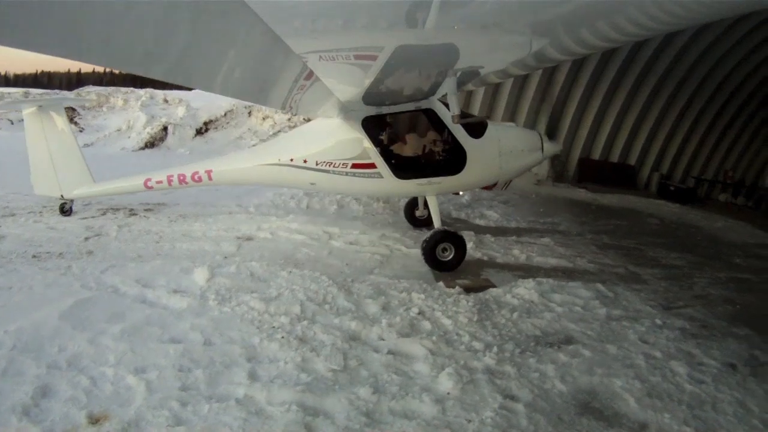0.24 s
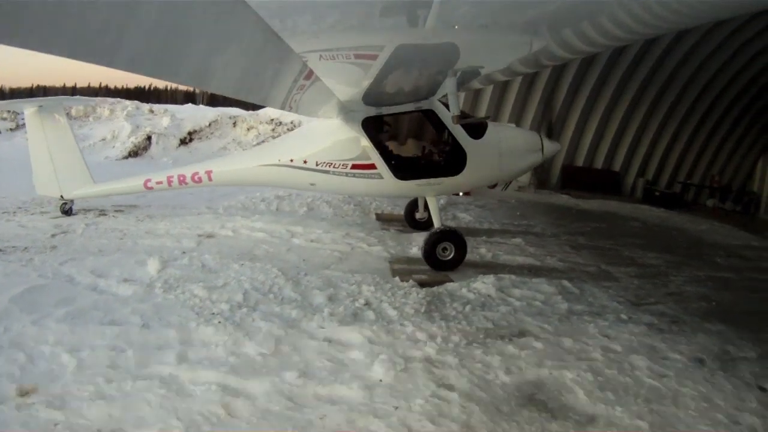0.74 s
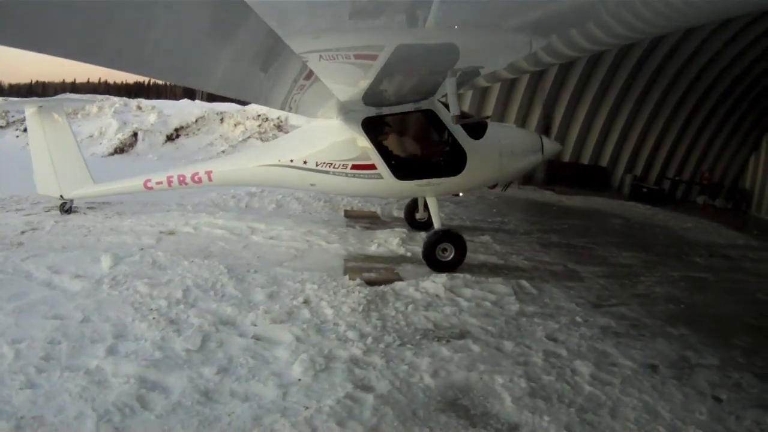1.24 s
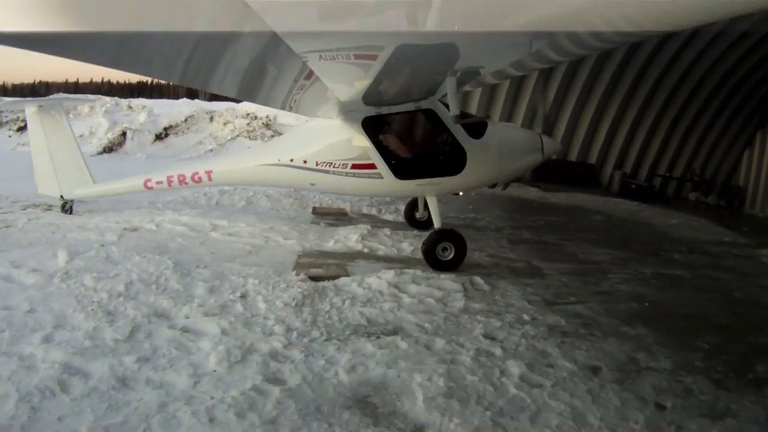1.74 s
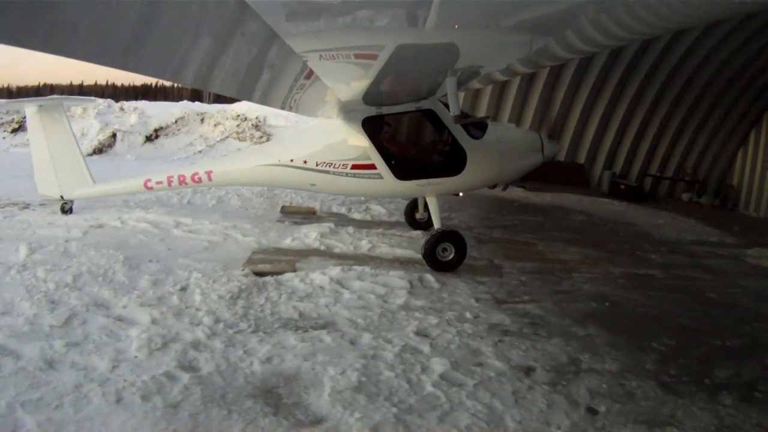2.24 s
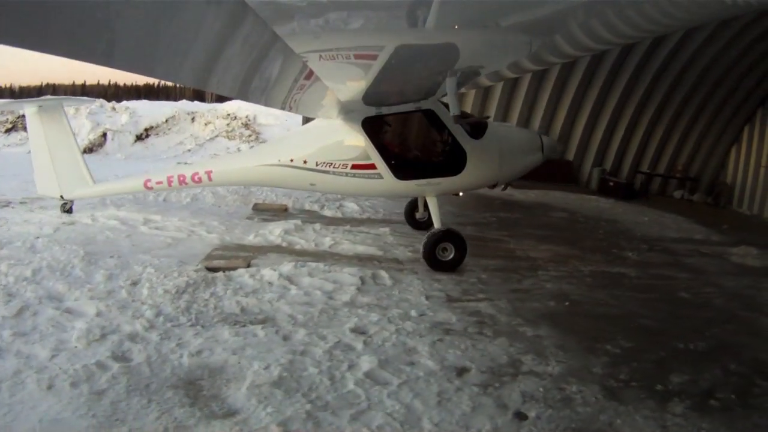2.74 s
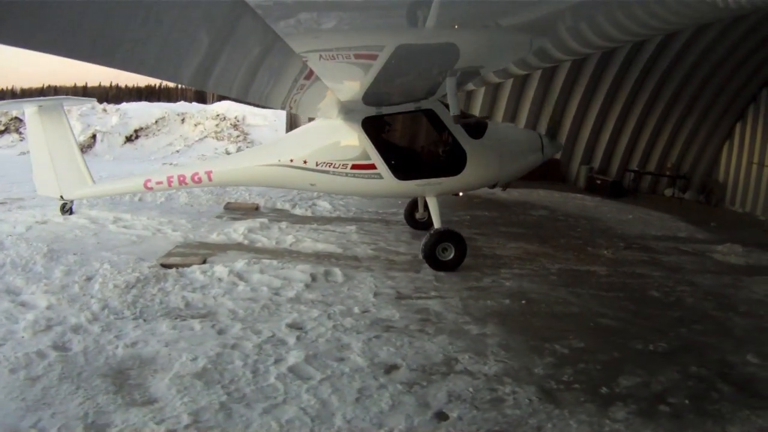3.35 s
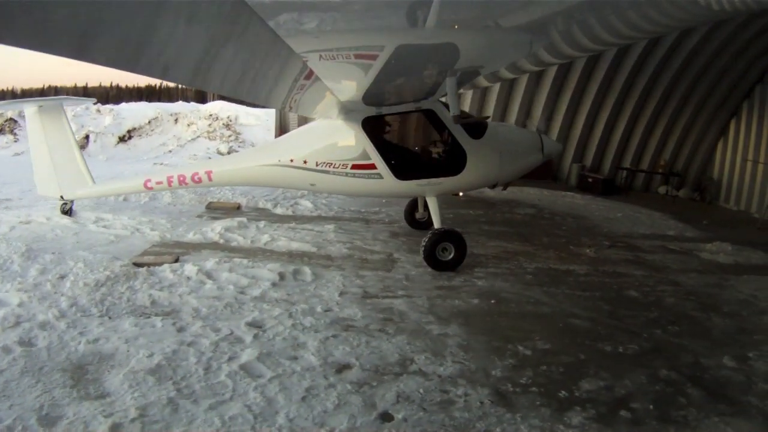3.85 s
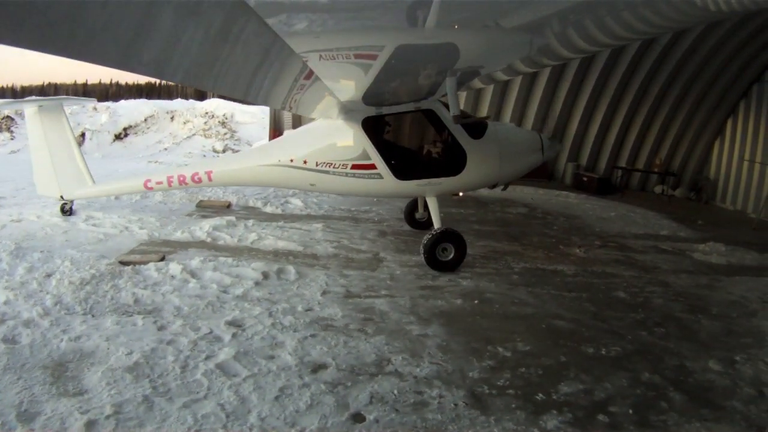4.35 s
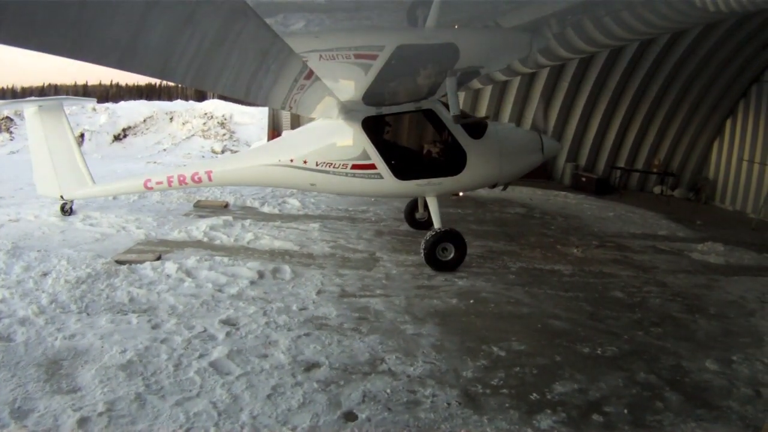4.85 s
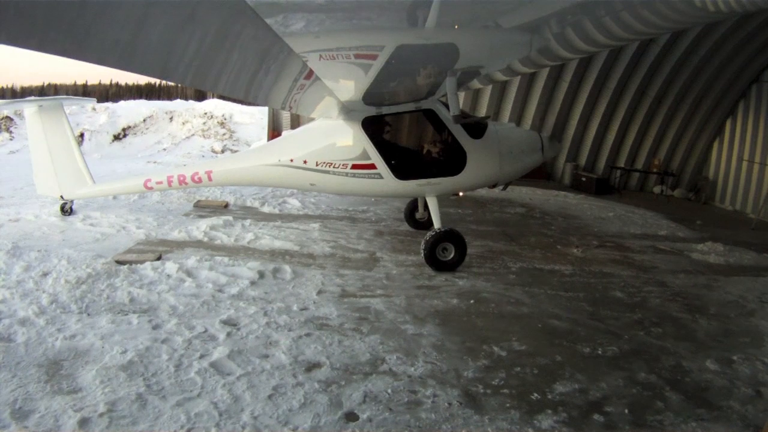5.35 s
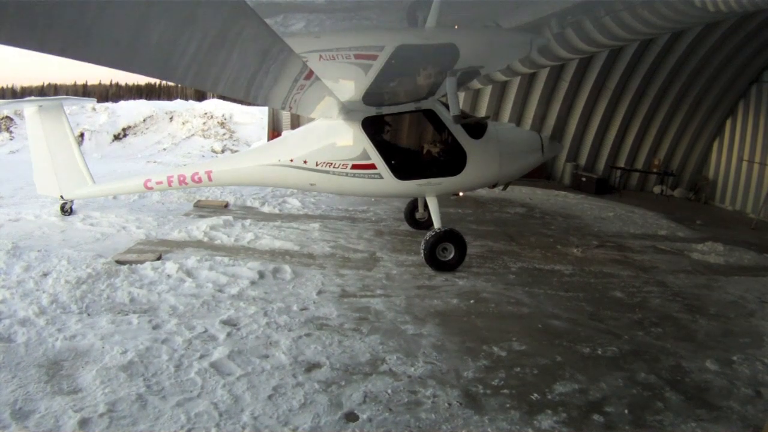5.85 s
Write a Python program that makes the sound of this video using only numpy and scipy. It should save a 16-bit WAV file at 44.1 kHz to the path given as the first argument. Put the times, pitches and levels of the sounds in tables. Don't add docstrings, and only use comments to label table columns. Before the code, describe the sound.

A small propeller plane taxies across snow toward a hangar: steady low engine throb, muffled roar, airy propeller hiss and irregular clicks from breaking crust. Just after two seconds the revs fall rapidly and settle into a slower, softer, clattery idle with few ticks. Close wing-mounted camera sound, vibrating, boxy and gritty, with a brittle digital edge on top.

```python
import sys
import numpy as np
from scipy import signal
from scipy.fft import rfft, irfft
from scipy.io import wavfile
from scipy.ndimage import uniform_filter1d

SR = 44100
rng = np.random.default_rng(int(sys.argv[2]) if len(sys.argv) > 2 else 0)


def wav_record(signal):
    frames = np.transpose(np.atleast_2d(signal))
    bounded = np.clip(frames, -1, 1)
    quanta = np.round(bounded * 32767).astype(np.int16)
    wavfile.write(sys.argv[1], SR, quanta)


def invert_db(x):
    u = np.asarray(x, float) / 20
    return 10 ** u


N = 269451


def rms_one(x):
    return x / np.sqrt(np.mean(x ** 2) + 1e-20)


def in_time(rows):
    s, *columns = np.transpose(rows)
    return [np.interp(np.arange(N) / SR, s, c) for c in columns]


def drift(rate):
    r = np.exp(-80 * np.pi * rate / SR)
    white = rng.standard_normal(N // 40 + 2002)
    slow = signal.lfilter([1], [1, -2 * r, r * r], white)[2000:]
    return np.interp(np.arange(N) / 40, np.arange(len(slow)), rms_one(slow))


def resonate(x, hz, width):
    r = np.exp(-np.pi * width / SR)
    zeros = [(1 - r * r) / 2, 0, (r * r - 1) / 2]
    poles = [1, -2 * r * np.cos(2 * np.pi * hz / SR), r * r]
    return signal.lfilter(zeros, poles, signal.lfilter(zeros, poles, x))


def coloured(points):
    hz, level_db = np.transpose(points)
    grid_hz = np.arange(1, N // 2 + 2) * SR / N
    shape = invert_db(np.interp(np.log(grid_hz), np.log(hz), level_db, left=-60))
    return rms_one(irfft(rfft(rng.standard_normal(N)) * shape, N))


def beat(turns, sharp):
    return np.exp(sharp * (np.cos(2 * np.pi * turns) - 1))


def by_throttle(row, throttle, firing_db):
    power_db, idle_db, share = row
    return throttle * power_db + (1 - throttle) * idle_db + share * firing_db


def ground_rumble():
    # f/Hz, level per Hz/dB
    rumble_spectrum = [(12, -9), (30, 24.5), (60, 2), (95, 6.5), (145, -2), (250, -5), (450, 2.5),
                       (650, -7), (1000, -6.5), (1500, -11), (3000, -25), (4500, -36)]
    return invert_db(1.36 * drift(14)) * coloured(rumble_spectrum)


def slipstream():
    # f/Hz, level per Hz/dB
    hiss_spectrum = [(2200, -8), (2900, 12), (3900, 14), (4450, 4.5), (5000, 7.5), (5550, 8), (6000, 0.5),
                     (7000, -20)]
    gusts_db = 1.2 * drift(40) + .9 * drift(16)
    return invert_db(gusts_db) * coloured(hiss_spectrum)


def wing():
    # t/s, level/dB
    swings = [(-0.048, -17.0), (0.284, -16.0), (0.46, -23.0), (0.724, -26.0), (1.044, -21.0), (1.318, -19.0),
              (1.474, -22.0), (1.724, -26.0), (1.972, -17.0), (2.118, -15.0), (2.386, -20.0), (2.544, -28.0),
              (2.658, -19.0), (2.808, -20.0), (3.068, -25.0), (3.606, -24.0), (4.07, -22.0), (4.52, -24.0),
              (5.586, -27.0), (5.852, -24.0)]
    bending_hz, rise_s, fade_s = 33, .07, .2
    out = np.zeros(N)
    for s, db in swings:
        since = np.maximum(np.arange(N) / SR - s, 0)
        envelope = (1 - np.exp(-since / rise_s)) * np.exp(-since / fade_s)
        out += invert_db(db + 0.8) * envelope * np.sin(2 * np.pi * bending_hz * since)
    return out


def panels(throttle, falling):
    # f/Hz, width/Hz, level/dB, rise under power/dB, rise per turn/s lost each second/dB
    panel_modes = [(19.2, 2.3, -54, 1, 0), (47.15, 4.5, -44.5, 6, 0), (109.8, 11, -54.5, 5, 0.1824),
                   (203.6, 18.5, -62, 4.5, 0.5056), (406.2, 35, -63.5, 9.5, 0)]
    out = np.zeros(N)
    for hz, width, db, power_db, shudder_db in panel_modes:
        ring = rms_one(resonate(rng.standard_normal(N), hz, width))
        out += invert_db(db) * ring * invert_db(power_db * throttle - shudder_db * falling)
    return out


def ticks(throttle):
    # t/s, peak level/dB
    crust_breaks = [(0.2593, -38), (0.3344, -38), (0.3431, -22), (0.3634, -35), (0.38, -34), (0.3954, -34),
                    (0.4125, -30), (0.4244, -35), (0.4334, -35), (0.4464, -34), (0.5357, -36),
                    (0.5487, -27), (0.5654, -36), (0.5891, -35), (0.7517, -36), (0.9714, -38),
                    (1.1727, -38), (1.1907, -35), (1.3733, -31), (1.4197, -36), (1.5189, -32),
                    (1.5324, -22), (1.5514, -36), (1.5723, -36), (2.2144, -41), (2.3585, -36),
                    (2.3674, -35), (2.5112, -41), (2.7596, -41), (2.8774, -35)]
    s, peak_db = np.transpose(crust_breaks)
    at = np.round((s + .0009) * SR).astype(int)
    jolts = np.full(N, 1e-18)
    jolts[at] = np.sqrt(np.maximum(invert_db(2 * peak_db) - invert_db(-87), 1e-6))
    crackle = rng.random(N) < 4 * throttle / SR
    jolts += crackle * invert_db(-43 + 2.5 * rng.standard_normal(N))
    grit_fade = invert_db(-60 / (.03 * SR))
    grit = signal.lfilter([1], [1, -grit_fade], np.sqrt(.04 * jolts)) * rng.standard_normal(N)
    jolts[at + round(.0007 * SR)] = -.6 * jolts[at]
    ring_hz, ring_db, ring_t60_s = 2250, -27.5, .005
    r, w = invert_db(-60 / (ring_t60_s * SR)), 2 * np.pi * ring_hz / SR
    ring = signal.lfilter([0, invert_db(ring_db)], [1, -2 * r * np.cos(w), r * r], jolts)
    crack_band = signal.butter(2, (1950, 5400), "band", fs=SR, output="sos")
    return invert_db(22.5) * signal.sosfilt(crack_band, jolts + ring + .05 * grit)


def clatter(turns, throttle):
    # f/Hz, width/Hz, level/dB
    valve_modes = [(3618, 225, 12), (3850, 1800, -14)]
    uneven = invert_db(3 * drift(35))
    seatings = beat(turns, 8) + .6 * beat(turns + .5, 8)
    white = (.6 + .8 * throttle + uneven * seatings) * rng.standard_normal(N)
    return rms_one(sum(invert_db(db) * resonate(white, hz, 0.81 * width) for hz, width, db in valve_modes))


def roar(turns, throttle):
    # f/Hz, width/Hz, level/dB
    housing_modes = [(778, 76, -10.5), (870.8, 36.5, -2), (1220, 174, -6.5), (1396, 90, -10),
                     (1715, 92, -7), (1853, 205, 0.5), (2236, 193, -7), (2514, 218, -9.5), (3065, 47, -10)]
    power_tilt = [-2, -0.8, -5.5, -0.8, 3, -0.8, -1.5, -0.5, -35]
    puffs = 1 + 0.42 * beat(2 * turns, 2.1) * invert_db(2.1 * drift(7.7))
    white = rng.standard_normal((2, N)) * puffs * invert_db(0.42 * drift(17.5))
    out = np.zeros(N)
    for k, (hz, width, db) in enumerate(housing_modes):
        ring = resonate(white[k % 2], hz, 1.52 * width)
        out += invert_db(db) * ring * invert_db(power_tilt[k] * throttle + 1.1 * drift(32))
    return rms_one(out)


def spar(hz):
    # f/Hz, width/Hz, lift/dB
    spar_modes = [(55, 1.7, 13), (112.5, 9, 11.5), (161, 5, 15)]
    lifts = (invert_db(2 * db) / (1 + (2 * (hz - top_hz) / width) ** 2) for top_hz, width, db in spar_modes)
    return np.sqrt(1 + sum(lifts))


def crank(speed, turns, falling, throttle, unbalance_db, firing_db):
    strong_orders = {2: (-47, -53, .1), 3: (-63, -60, 0), 4: (-60, -48, .7), 6: (-42.5, -68, 1)}
    # multiple of crank speed, level/dB
    taxi_orders = [(0.5, -21), (1, 0), (1.5, -24), (2, -18), (2.5, -28), (3, -23), (3.5, -34), (4, -23),
                   (4.5, -36), (5, -24), (5.5, -32), (6, -14), (6.5, -38), (7, -35), (7.5, -39), (8, -28),
                   (8.5, -40), (9, -31), (9.5, -30), (10, -33), (10.5, -26), (11, -26), (11.5, -39),
                   (12, -33)]
    # multiple of crank speed, level/dB
    idle_orders = [(0.5, -25), (1, 0), (1.5, -13), (2, -8), (2.5, -30), (3, -22), (3.5, -31), (4, 0),
                   (4.5, -29), (5, -33), (5.5, -36), (6, -31), (6.5, -34), (7, -21), (7.5, -23), (8, -24),
                   (8.5, -28), (9, -22), (9.5, -35), (10, -33), (10.5, -38), (11, -35), (11.5, -39),
                   (12, -29)]
    out = invert_db(unbalance_db) * np.cos(2 * np.pi * turns)
    lull_db = -14 * 4 * throttle * (1 - throttle)
    for k, row in strong_orders.items():
        level_db = by_throttle(row, throttle, firing_db) + lull_db * (k in (3, 4)) + .9 * drift(5.0)
        out += invert_db(level_db) * spar(k * speed) * np.cos(2 * np.pi * k * turns)
    slowing_db = .5 * falling
    for (k, taxi_db), (_, idle_db) in zip(taxi_orders, idle_orders):
        if k <= 4 or k == 6:
            continue
        waver_db, start = 3.5 * drift(2.85), rng.random()
        level_db = throttle * (taxi_db - 30.5) + (1 - throttle) * (idle_db - 34.2)
        out += invert_db(level_db + slowing_db + waver_db - 1.5) * np.cos(2 * np.pi * (k * turns + start))
    return np.sqrt(2) * out


def scene():
    # t/s, crank speed/turns per s, unbalance level/dB
    engine_curve = [(0, 38.92, -36), (.3, 38.66, -30), (.75, 38.71, -32), (1.1, 38.77, -33),
                    (1.4, 38.33, -32), (1.6, 38.94, -31), (1.88, 38.46, -35), (2, 35.98, -46),
                    (2.2, 29.7, -33), (2.4, 27.07, -34), (2.7, 27.4, -39), (3, 27.93, -35),
                    (3.75, 27.61, -37), (4.05, 28.17, -36), (4.6, 27.97, -36), (5.3, 28.23, -37),
                    (5.6, 26.97, -39), (6.11, 26.71, -47)]
    # t/s, opening/0-1
    throttle_curve = [
        (0, 1),
        (1.96, 1),
        (2.17, 0),
        (6.2, 0),
    ]
    # t/s, level/dB
    firing_curve = [(0, -8), (.35, -4), (.8, 0.5), (1.1, -5), (1.3, -1.5), (1.6, 2.5), (1.9, -1.5),
                    (2.25, -4), (2.39, -16), (2.5, -4), (2.8, -1.5), (3.5, -0.5), (4.7, 2.5), (5.4, 0.5),
                    (5.7, -5), (6.11, -1.5)]
    speed, unbalance_db = in_time(engine_curve)
    throttle, = in_time(throttle_curve)
    firing_db, = in_time(firing_curve)
    turns = .5 + np.cumsum(speed) / SR
    falling = uniform_filter1d(np.minimum(np.gradient(speed) * SR, 0), size=4000)

    rumble_db = by_throttle((-48, -50.5, 0.17), throttle, firing_db) + 7.5
    stream_db = by_throttle((-57.5, -61.5, 0.22), throttle, firing_db) + 7.5
    clatter_db = by_throttle((-57.5, -49.5, 0.48), throttle, firing_db)
    roar_db = by_throttle((-37.5, -40, 0.21), throttle, firing_db) + 0.5

    noise = invert_db(rumble_db) * ground_rumble() + invert_db(stream_db) * slipstream()
    noise += invert_db(clatter_db) * clatter(turns, throttle) + invert_db(roar_db) * roar(turns, throttle)
    shaking = crank(speed, turns, falling, throttle, unbalance_db, firing_db) + wing()
    airframe = invert_db(-0.06) * shaking + panels(throttle, falling)
    return (airframe + noise + ticks(throttle))[None]


def low_pass(x):
    return signal.sosfilt(signal.butter(12, 15290, fs=SR, output="sos"), x)


def record(dry):
    smooth = signal.sosfilt(signal.butter(11, 5780, fs=SR, output="sos"), dry)
    slow = signal.resample_poly(smooth, 40, 147, axis=1)
    steps = np.repeat(slow, 4, axis=1)
    held = signal.resample_poly(steps, 147, 160, axis=1)[:, :N]
    held = signal.sosfilt(signal.ellip(10, .3, 80, 15480, fs=SR, output="sos"), held)
    return low_pass(held)


dry = scene()
out = record(dry)
wav_record(out)
```